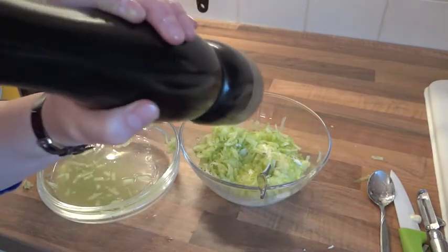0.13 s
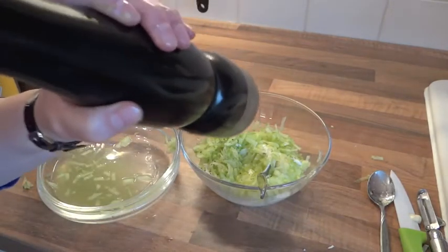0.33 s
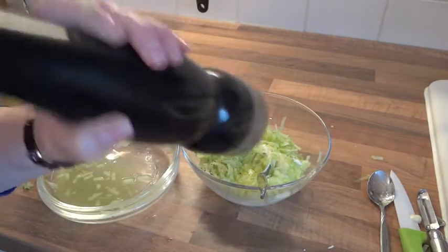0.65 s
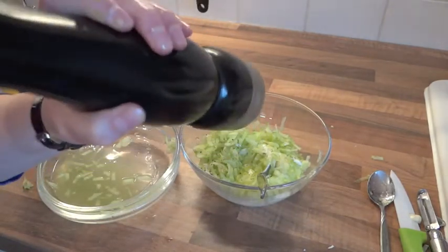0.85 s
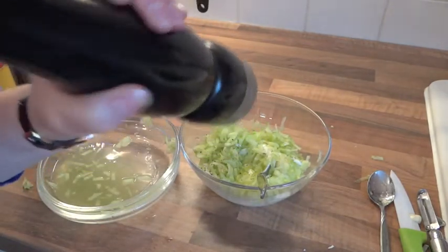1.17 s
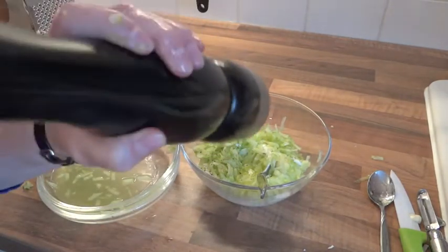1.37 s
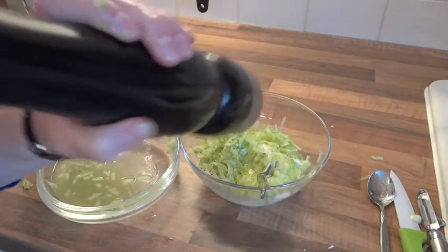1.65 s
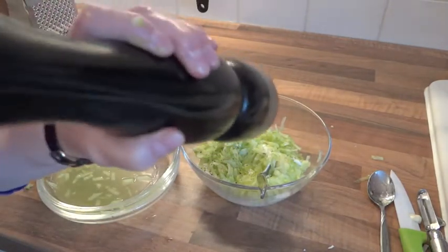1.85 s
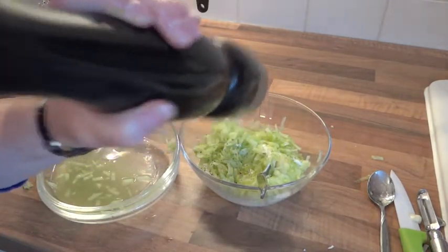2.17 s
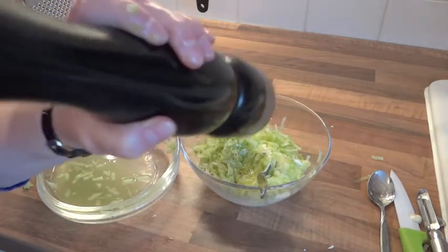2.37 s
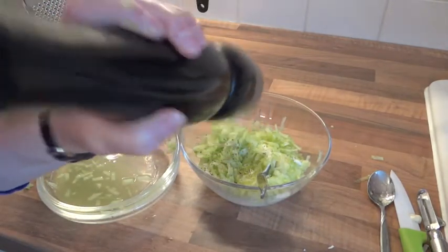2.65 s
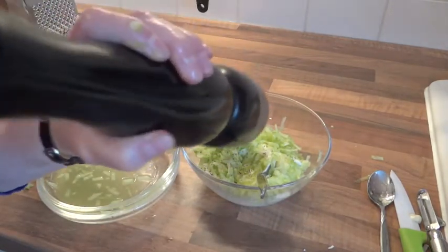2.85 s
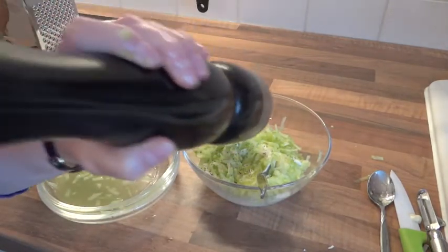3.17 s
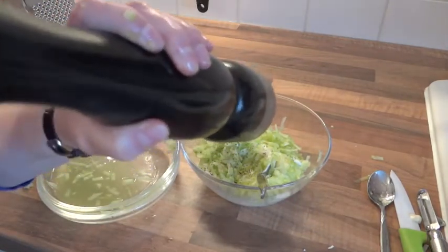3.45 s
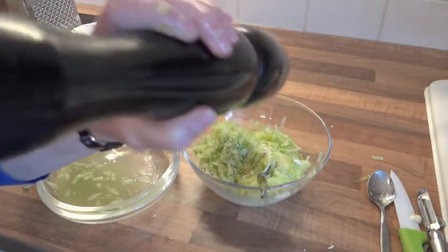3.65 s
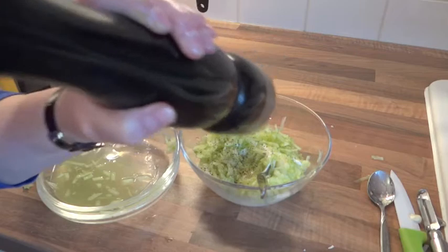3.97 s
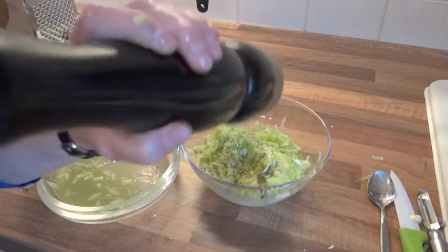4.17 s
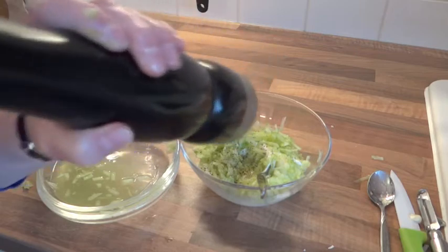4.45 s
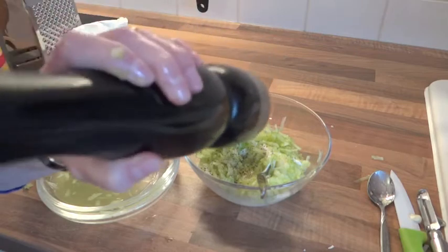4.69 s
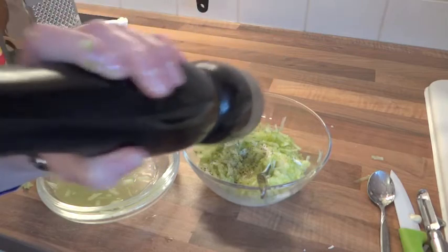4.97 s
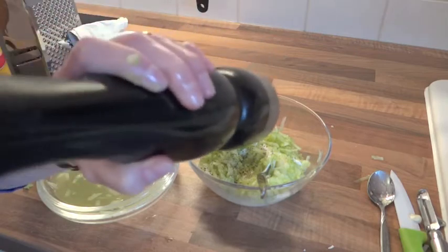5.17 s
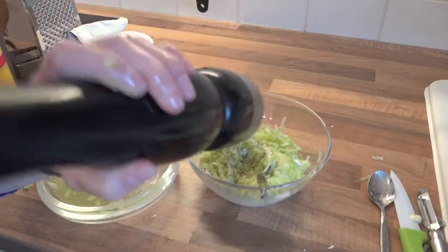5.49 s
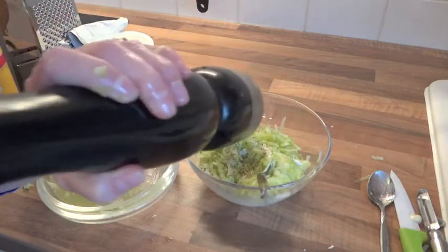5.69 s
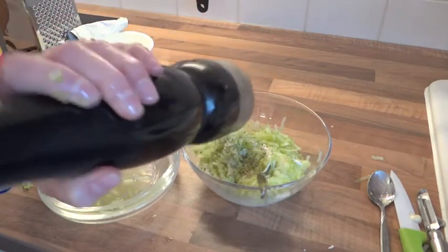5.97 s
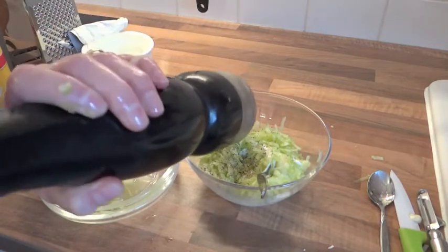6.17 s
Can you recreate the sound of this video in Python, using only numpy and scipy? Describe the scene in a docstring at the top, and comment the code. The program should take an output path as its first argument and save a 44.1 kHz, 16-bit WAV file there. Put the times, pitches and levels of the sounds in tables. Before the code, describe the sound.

A wooden pepper mill is twisted by hand in a tiled kitchen, peppercorns crunching in short gritty bursts about twice a second, with small creaks and ticks.

```python
"""In a tiled kitchen, a tall wooden pepper mill is twisted by hand over a bowl, about twice a second.
In each twist the burr bites and crushes corns: coarse fractures and fine grit ring the mill's body.
Sharp cracks and clicks are bursts of tiny snaps; pitched creaks are stick-slip jerks through a resonance.
The mechanism ticks, the loose head knocks and the steel shaft clinks as the hand shifts its grip.
Dense echoes let the room ring on after every crunch, over a faint, steady rush of air."""
import sys
import numpy as np
from scipy import signal
from scipy.fft import rfft, irfft
from scipy.io import wavfile
from scipy.ndimage import uniform_filter1d

SR = 44100
rng = np.random.default_rng(int(sys.argv[2]) if len(sys.argv) > 2 else 0)


def to_wav(sig):
    """Store sig (one row per channel, or 1-D mono) as 16-bit WAV at the path in sys.argv[1].

    Samples outside -1..1 are clipped; the rate is SR.
    """
    pcm = np.clip(np.atleast_2d(sig), -1, 1) * 32767
    pcm = np.round(pcm).astype(np.int16)
    wavfile.write(sys.argv[1], SR, pcm.T)  # frames by channels


N = 279153  # length in samples

# Levels and colours in the tables are relative gains, set before the room and any trim;
# twists, cracks and ticks also pass through the body.
# twists of the head: bite_s, slack_before_s, swell_s, hold_s, level_db, slack_against_level_db,
# low_colour_db, bright_colour_db
TWISTS = [(-0.01, .01, 0.0049, 0.0013, -19, -22, 2.5, 4),
          (0.4337, 0.036, 0.00157, 0.0074, -29, -13, -2, 12),
          (1.066, 0.059, 0.023, 0.02, -19.2, -31, 1, -1.4), (1.615, .05, .05, 0.029, -20.5, -26.5, 0, -1),
          (2.078, .002, 0.061, 0.0043, -19.5, -30, 5, -2), (2.542, .068, 0.02, .064, -18.5, -26.5, -5.5, 0),
          (3.02, 0.073, 0.041, 0.022, -17, -20.5, 0, 2.1), (3.495, 0.038, 0.061, .002, -17, -23, 0, -2),
          (3.984, .055, 0.055, 0.029, -16.5, -21, -3.5, -2.5),
          (4.456, .028, 0.039, 0.029, -16, -12.5, -8, -3.8), (4.92, .036, 0.034, 0.026, -19, -14, -3, 5),
          (5.393, 0.039, 0.054, 0.02, -15.5, -22.5, -7.5, -1),
          (5.925, 0.035, 0.032, 0.042, -19, -12.5, -1.5, 2)]
# sharp cracks and clicks, corns giving way or the mill knocking between twists:
# start_s, rise_ms, level_db, low_colour_db, bright_colour_db
CRACKS = [(0.1692, 1, -16.5, 0, 1), (0.377, 6.3, -34, 10, 3.5), (0.4018, 6.8, -18, -4, -3.5),
          (0.557, 3, -27, -5, 2.5), (0.5797, 2.1, -24, 4, -0.5), (0.6306, 2.2, -21.5, -4.5, -1),
          (1.0641, 1.9, -22, -6, 9), (1.1839, 3.9, -29.5, 15, 11.5), (1.6244, 1.9, -11.5, -5.5, -7.5),
          (1.6344, 5.1, -20, -4, 5.5), (1.6726, 1.5, -10.5, -9, -7.5), (2.138, 3.7, -13.5, -10, -2.5),
          (3.028, 5.3, -15, -19, -9), (3.4978, 3.4, -24.5, 1, 0.5), (3.533, 3.2, -12, -24, -3),
          (3.968, 13, -32, 10.5, -1), (4.0178, 1.1, -22, 6, 6.5), (4.452, 5.4, -12, -10.5, -3),
          (4.503, 2.7, -14, 4, -0.5), (4.9227, 2.2, -20, 2, 0), (5.391, 4.2, -27.5, 7, 2),
          (5.4047, 3.3, -10.5, -8, -8.5), (5.6232, 4.1, -20, -7, 1), (5.8955, 6.5, -27, -9, 6.5),
          (5.9267, 2.1, -10.5, -14, -4.5)]
# pitched creaks of the burr, with a few very short rows that sharpen a click or snap:
# start_s, length_s, pitch_hz, width_hz, level_db
CREAKS = [(.17, .002, 2160, 1800, -16), (.17, 0.004, 3280, 450, -32), (.432, 0.0098, 7550, 3000, -19.5),
          (.434, 0.045, 5580, 202, -28.5), (1.062, 0.031, 4750, 328, -27), (1.183, 0.0094, 805, 250, -31),
          (1.643, 0.023, 2014, 201, -22), (2.136, 0.022, 4770, 400, -28), (2.31, 0.0051, 2840, 400, -31),
          (2.556, 0.095, 1730, 261, -26.5), (2.57, 0.033, 7450, 450, -30.5), (3.054, 0.086, 1520, 220, -25),
          (4.027, 0.047, 2090, 220, -28), (4.021, 0.066, 1737, 220, -24.5),
          (4.462, 0.054, 2010, 200, -27.5), (4.958, 0.059, 1340, 109, -25), (5.428, 0.07, 3710, 150, -28),
          (5.925, 0.057, 4430, 500, -26.5)]
# ticks of the mechanism as the hand lets go or regrips: start_s, rise_ms, level_db, bright_colour_db
TICKS = [(0.341, 4.3, -35.5, 2.5), (0.362, 6.6, -30, 0.5), (0.712, 1.2, -30, -3), (1.0024, 2.3, -34, 5),
         (1.567, 5.5, -53, 7), (1.846, 4.7, -27.5, 1), (2.0618, 0.72, -23, 0.5), (2.3096, 2.9, -33, 5.5),
         (2.472, 5.8, -41.5, 3), (2.7765, 4.6, -31, 7), (2.9475, 1.9, -39, 8), (3.2369, 1.84, -25.5, 5),
         (3.419, 5.4, -42, 2.5), (3.4521, 2.9, -32.5, -1.5), (3.7231, 3.5, -26.5, -3),
         (3.929, 3.8, -36, -3), (4.4125, 3.7, -31, -1.5), (4.6776, 3.2, -32.5, 5.5),
         (4.7781, 3.6, -30, 7.5), (5.356, 4.7, -30, -12), (5.7924, 2.4, -33, 3.5), (5.864, 5, -32.5, 0)]
# dull knocks of the loose head on the wooden body: start_s, level_db
KNOCKS = [(0.404, -39.5), (0.582, -44), (1.187, -37.5), (2.309, -47.5), (3.235, -41.5)]
# clinks of the steel shaft in its seat as the hand shifts: start_s, contact_s, level_db
CLINKS = [(4.675, 0.0027, -28), (4.777, 0.002, -24.5), (4.919, 0.0037, -18)]
# ring of the steel shaft: pitch_hz, width_hz, level_db
SHAFT_MODES = [(3040, 74, -6), (4030, 90, 7.5), (4580, 53, -2), (5470, 39, -7), (6160, 55, -18),
               (6930, 63, -6), (7800, 20, -13), (8530, 44, -17)]
# where the tone colours act, low, middle (always 0 dB), bright and top: frequency_hz
COLOUR_HZ = [600, 1500, 3700, 7500]
# the bare snap of a fracture: frequency_hz, level_db
SNAP = [(25, -34), (60, -19.5), (120, -16), (190, -9.5), (280, -8), (420, -8.5), (560, 0), (1000, 1.5),
        (2500, 0.5), (5000, -2), (7500, -2.5), (10000, -9.5), (11000, -21)]
# resonances of the wooden body, its bore and the burr: pitch_hz, width_hz, level_db
MILL_MODES = [(298.6, 30, 0.5), (733, 19, 5.5), (1293, 75, 12.5), (1386, 54, 16), (1471, 14, 14),
              (1588, 22, 11.5), (1672, 19, 6), (1834, 19, 9), (1964, 78, 6), (1990, 20, 5), (2093, 38, 6.5),
              (2680, 18, 6), (3357, 56, 7), (3370, 59, 8), (3592, 81, 6.5), (3666, 23, 6), (4250, 30, 3.5),
              (4740, 56, 4), (4867, 50, 5), (5496, 79, 1.5), (6200, 98, -1.5), (7900, 28, -8.5)]
# ring of the kitchen: frequency_hz, t60_s
KITCHEN_T60 = [(200, 0.28), (600, 0.35), (1050, 0.41), (1380, 0.45), (2300, 0.41), (3600, 0.41),
               (7000, 0.36), (10000, 0.3)]
# spectrum shape of the still kitchen air: frequency_hz, density_db (per Hz)
AIR_SPECTRUM = [(15, -48), (25, -21), (87, -7.5), (145, -12.5), (207, 0), (254, 0), (505, -9.5), (651, -15),
                (1510, -22), (1710, -22.5), (5970, -33), (7510, -25), (11000, -33.5), (14300, -69.5),
                (22000, -120)]

BITE_S = 0.00081  # the teeth catch this fast
SWELL_DB_PER_S, RUN_OUT_DB_PER_S = 194, 223  # shared by all twists
# the rub through the slack grows towards the bite and has its own bright and top colours
SLACK_GROWTH_DB, SLACK_BRIGHT_DB, SLACK_TOP_DB = 8.5, -3, -4.5
CRUSH_TOP_DB, CRACK_TOP_DB = 0.5, 1  # top colour against the bright colour
# the top of a tick follows its bright colour, but more steeply
TICK_LOW_DB, TICK_TOP_DB, TICK_TOP_FOLLOWS = -2.5, -11, 1.9
AIR_DB = -58
TOP_HZ = 11080  # upper limit of the recorder


def undb(db):
    """Decibels to gain."""
    return 10 ** (np.asarray(db) / 20)


def on_log_axis(hz, points):
    """Read (Hz, value) points at the given frequencies, along a logarithmic pitch axis."""
    at, value = np.transpose(points)
    return np.interp(np.log(np.maximum(hz, 1)), np.log(at), value)


def response(gain_at, size):
    """Causal impulse response with the gain gain_at(Hz), from the folded cepstrum."""
    cepstrum = irfft(np.log(gain_at(np.fft.rfftfreq(size, 1 / SR))))
    cepstrum[1:size // 2] *= 2
    cepstrum[size // 2 + 1:] = 0
    return irfft(np.exp(rfft(cepstrum)))


def add(track, start, x):
    """Mix x into the track from sample start on."""
    x = x[:N - start]
    track[start:start + len(x)] += x


def stereo(mid, side):
    """Left and right from mid and side."""
    return np.array([mid + side, mid - side])


def coloured(x, low_db, bright_db, top_db, bass_hz=250, bass_db=-3.0):
    """Big soft pieces break dull, small hard ones bright; the hand-damped bass varies half as much."""
    points = [(bass_hz, bass_db + low_db / 2), *zip(COLOUR_HZ, (low_db, 0, bright_db, top_db))]
    return signal.fftconvolve(x, response(lambda hz: undb(on_log_axis(hz, points)), size=512))


def grains(n, per_s, spread_db, even_s):
    """Random fractures of uneven size, levelled to even power over even_s."""
    breaks = rng.random(n) < per_s / SR
    sizes = undb(spread_db * rng.standard_normal(n))
    x = breaks * rng.choice([-1, 1], n) * sizes
    power = uniform_filter1d(x ** 2, max(int(even_s * SR), 2))
    return x / np.sqrt(np.maximum(power, 1e-9))


def crumble(n, split_hz=2600, clump_s=.008, coarse_clump_db=3.0, fine_clump_db=2.0):
    """Few coarse fractures carry the middle, dense fine grit the treble; both clump, corn by corn."""
    hold = int(clump_s * SR)
    steps = np.repeat(rng.standard_normal(n // hold + 1), hold)
    clumps = uniform_filter1d(steps, hold // 2)[:n]
    coarse = grains(n, per_s=500, spread_db=1.0, even_s=.03) * undb(coarse_clump_db * clumps)
    fine = grains(n, per_s=4000, spread_db=4.5, even_s=0.013) * undb(fine_clump_db * clumps)
    low = signal.butter(2, split_hz, "low", fs=SR, output="sos")
    high = signal.butter(2, split_hz, "high", fs=SR, output="sos")
    return signal.sosfilt(low, coarse / np.std(coarse)) + signal.sosfilt(high, fine / np.std(fine))


def twists(length_s=0.28):
    """The burr rubs faintly through its slack, bites, swells to its hardest crush, holds and runs out."""
    track = np.zeros(N)
    for bite_s, slack_s, swell_s, hold_s, level_db, slack_db, low_db, bright_db in TWISTS:
        start = max(int((bite_s - slack_s) * SR), 0)
        age = (start + np.arange(int(length_s * SR))) / SR - bite_s  # seconds since the bite
        grit = undb(level_db) * crumble(len(age))

        bitten = np.clip(1 + age / BITE_S, 0, 1) ** 2
        taken_up = np.clip(1 + age / slack_s, 0, 1)
        slack = (1 - bitten) * undb(slack_db + SLACK_GROWTH_DB * (taken_up - .5))

        below_peak_db = SWELL_DB_PER_S * np.maximum(swell_s - age, 0)
        run_out_db = RUN_OUT_DB_PER_S * np.maximum(age - swell_s - hold_s, 0)
        crush = bitten * undb(-below_peak_db - run_out_db)

        add(track, start, coloured(slack * grit, low_db, SLACK_BRIGHT_DB, SLACK_TOP_DB))
        add(track, start, coloured(crush * grit, low_db, bright_db, bright_db + CRUSH_TOP_DB))
    return track


def resonance(hz, centre_hz, width_hz):
    """Power gain of one damped mode, 1 at its centre."""
    hz = np.maximum(hz, 1)
    return 1 / (1 + ((hz ** 2 - centre_hz ** 2) / (hz * width_hz)) ** 2)


def mode_power(hz, modes):
    """Summed power gain of a body's damped modes."""
    return sum(undb(db) ** 2 * resonance(hz, centre_hz, width_hz) for centre_hz, width_hz, db in modes)


def mill_body(x, ring_db):
    """The snap is heard bare and through the resonances of the mill."""
    def gain_at(hz):
        bare_power = undb(on_log_axis(hz, SNAP)) ** 2
        ring_power = undb(ring_db) ** 2 * mode_power(hz, MILL_MODES)
        return np.sqrt(bare_power + ring_power)
    return signal.fftconvolve(x, response(gain_at, size=8192))[:N]


def echoes(first_echo_s=0.0022):
    """Mid and side tails of dense echoes, each band fading at its own rate."""
    hz, frame_s, bands = signal.stft(rng.standard_normal((2, SR)), SR, nperseg=256)
    decay = np.log(1000) / on_log_axis(hz, KITCHEN_T60)[:, None]  # 60 dB down after t60
    fading = bands * np.exp(-decay * frame_s) * np.sqrt(2 * decay / SR)  # evens the energy of the bands
    tails = signal.istft(fading, SR)[1][:, :SR]
    return tails * (np.arange(SR) / SR > first_echo_s)


def kitchen(x, wet_db=0.5, side_db=-9.5, sway_s=.025, paths=4):
    """Worktop and tiles answer almost at once; the mill turns and sways, so its sound takes new paths."""
    hold = int(sway_s * SR)
    steps = np.repeat(rng.standard_normal((N // hold + 1, paths)).T, hold, axis=1)
    shares = uniform_filter1d(steps, hold)[:, :N]
    shares /= np.linalg.norm(shares, axis=0)  # total power stays even
    wet = sum(signal.fftconvolve([x * share], echoes(), axes=1)[:, :N] for share in shares)
    mid, side = undb(wet_db) * wet
    return stereo(x + mid, undb(side_db) * side)


def air(side_db=-12):
    """A faint, steady rush, mostly low, made of noise shaped by the air spectrum."""
    gain = undb(on_log_axis(np.fft.rfftfreq(N, 1 / SR), AIR_SPECTRUM))
    mid, side = irfft(rfft(rng.standard_normal((2, N))) * gain, N)
    return undb(AIR_DB) * stereo(mid, undb(side_db) * side) / np.std(mid)


def burst(rise_ms):
    """A cascade of tiny snaps that swells to its peak at rise_ms and dies away."""
    ms = 1000 * np.arange(SR // 10) / SR
    age = ms / rise_ms
    return age * np.exp(1 - age) * grains(len(ms), per_s=9000, spread_db=4.5, even_s=0.0019)


def cracks():
    """A corn gives way, or the mill knocks between twists: a sharp burst of tiny snaps."""
    track = np.zeros(N)
    for start_s, rise_ms, level_db, low_db, bright_db in CRACKS:
        snaps = undb(level_db) * burst(rise_ms)
        add(track, int(start_s * SR), coloured(snaps, low_db, bright_db, bright_db + CRACK_TOP_DB))
    return track


def rub(length_s, gain_at):
    """A short run of stick-slip jerks through a resonance; mean power 1 over its length."""
    n = int(length_s * SR)
    jerks = grains(n, per_s=5500, spread_db=2.0, even_s=0.0011) * signal.windows.tukey(n, .5)
    x = signal.fftconvolve(jerks, response(gain_at, size=4096))
    return x * np.sqrt(n / (np.sum(x ** 2) + 1e-9))


def creaks(trim_db=-0.5):
    """Stick-slip jerks in the burr ring at one pitch; the very short ones sharpen a click or snap."""
    track = np.zeros(N)
    for start_s, length_s, pitch_hz, width_hz, level_db in CREAKS:
        creak = rub(length_s, lambda hz: resonance(hz, pitch_hz, width_hz))
        add(track, int(start_s * SR), undb(level_db + trim_db) * creak)
    return track


def ticks():
    """The burr shifts in its play: a short, gritty burst, mostly with less top than a crack."""
    track = np.zeros(N)
    for start_s, rise_ms, level_db, bright_db in TICKS:
        snaps = undb(level_db) * burst(rise_ms)
        top_db = TICK_TOP_FOLLOWS * bright_db + TICK_TOP_DB
        add(track, int(start_s * SR), coloured(snaps, TICK_LOW_DB, bright_db, top_db))
    return track


def knocks(pitch_hz=300, width_hz=160, length_s=0.013, trim_db=-1.5):
    """A soft wooden bump, one broad low resonance, as the hand lets go of the head."""
    track = np.zeros(N)
    for start_s, level_db in KNOCKS:
        bump = rub(length_s, lambda hz: resonance(hz, pitch_hz, width_hz))
        add(track, int(start_s * SR), undb(level_db + trim_db) * bump)
    return track


def clinks():
    """The shaft knocks in its seat; modes swell with the contact and die at a rate set by their width."""
    track = np.zeros(N)
    t = np.arange(SR // 4) / SR
    for start_s, contact_s, level_db in CLINKS:
        ring = np.zeros(len(t))
        for pitch_hz, width_hz, mode_db in SHAFT_MODES:
            tone = np.sin(2 * np.pi * (pitch_hz * t + rng.random()))
            ring += undb(mode_db) * np.exp(-np.pi * width_hz * t) * tone
        add(track, int(start_s * SR), undb(level_db) * ring * (1 - np.exp(-t / contact_s)))
    return track


def scene(left_db=0.4):
    """The mill in the kitchen, a touch to the left; crushing rings the body more than single cracks do."""
    crunch = mill_body(twists(), ring_db=-.5) + mill_body(cracks() + ticks(), ring_db=-2.0)
    mill = crunch + creaks() + knocks() + clinks()
    return (kitchen(mill) + air()) * undb([[left_db], [-left_db]])


def record(dry, ceiling=1.0):
    """The microphone loses the deepest bass and rounds the highest peaks; the recorder cuts the top."""
    thinned = signal.sosfilt(signal.butter(2, 35, "high", fs=SR, output="sos"), dry)
    rounded = ceiling * np.tanh(thinned / ceiling)
    return signal.sosfilt(signal.ellip(12, .2, 70, TOP_HZ, fs=SR, output="sos"), rounded)


dry = scene()
out = record(dry)
to_wav(out)
```